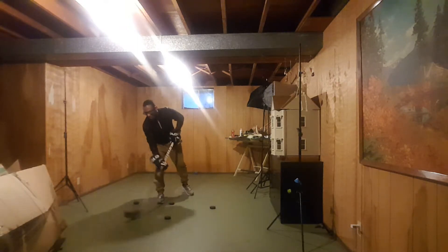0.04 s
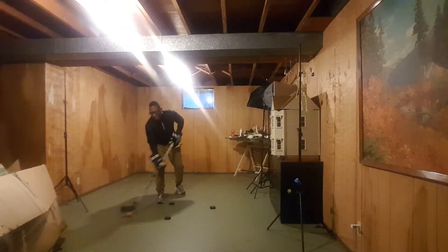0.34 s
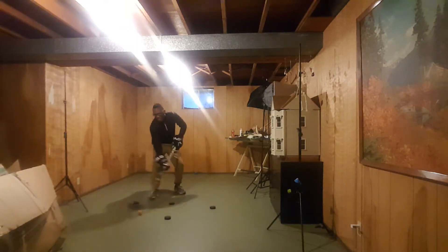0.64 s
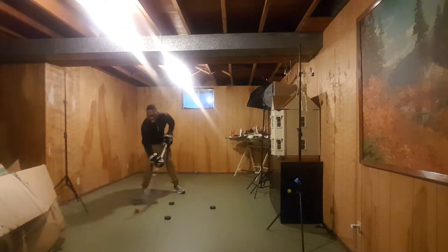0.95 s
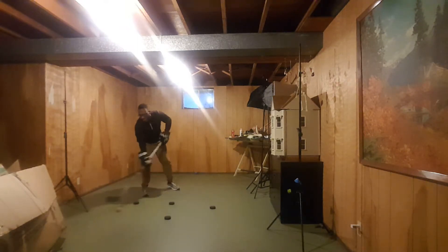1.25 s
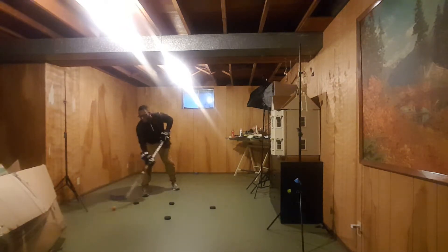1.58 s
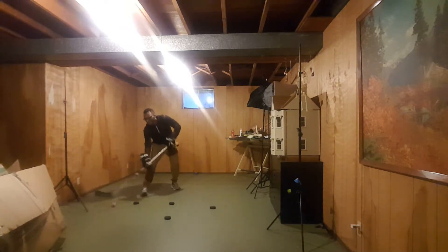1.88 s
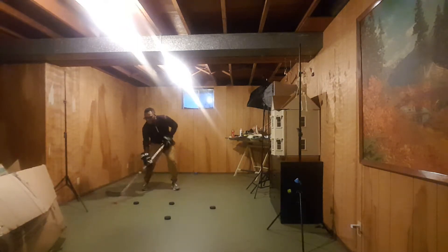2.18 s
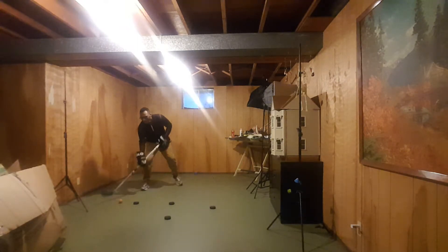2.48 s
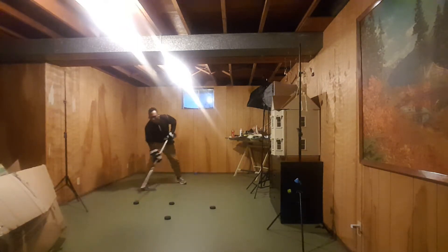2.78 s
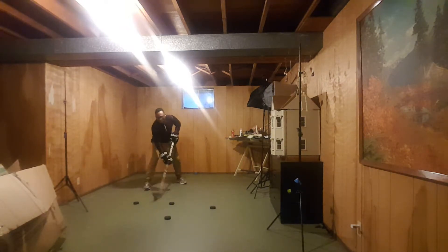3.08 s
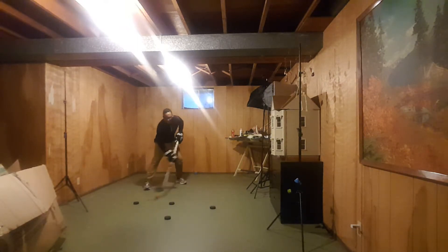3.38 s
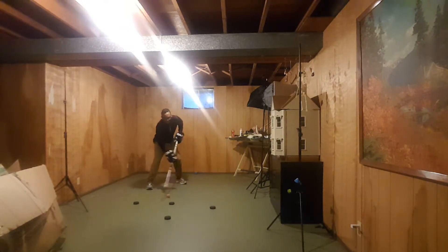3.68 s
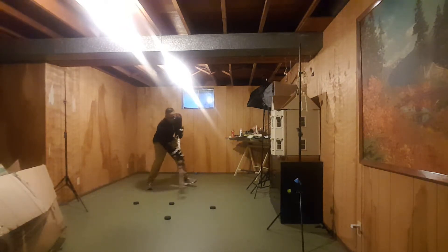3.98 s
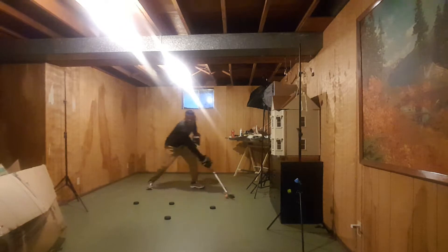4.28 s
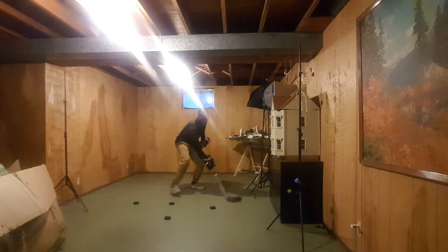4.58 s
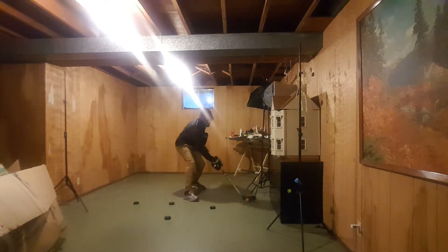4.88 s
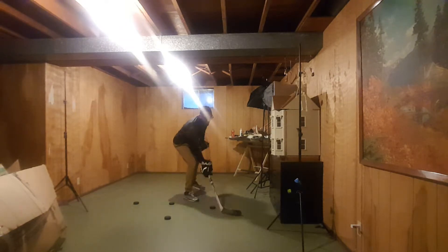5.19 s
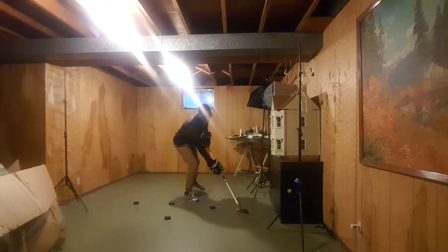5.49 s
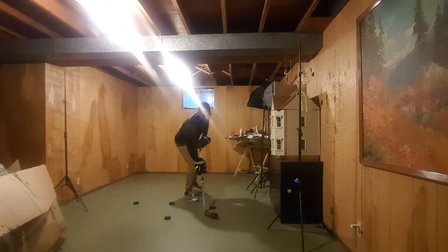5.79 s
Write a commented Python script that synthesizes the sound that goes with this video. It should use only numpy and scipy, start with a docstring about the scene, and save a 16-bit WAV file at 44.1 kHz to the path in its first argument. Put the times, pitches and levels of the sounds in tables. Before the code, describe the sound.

Hollow puck clicks alternate with sharp clacks and duller knocks of a hockey blade on concrete, with a short room echo.

```python
"""A panelled basement, where a player is stickhandling at about three strokes a second. The hockey blade
clicks against a plastic puck, slaps the concrete floor and slides on grit, over the hush of the house.
Each impact excites the resonances of stick and panelling. The microphones stand across the room, so they
hear mostly the reverberant field of the walls, and their gain control ducks under every hard blow."""
import sys
import numpy as np
from scipy import signal
from scipy.fft import rfft, irfft, next_fast_len
from scipy.io import wavfile
from scipy.ndimage import uniform_filter1d, map_coordinates

SR = 44100
rng = np.random.default_rng(int(sys.argv[2]) if len(sys.argv) > 2 else 0)


def int16_out(signal):
    """Quantize to a 16-bit WAV file."""
    q = np.round(np.clip(np.atleast_2d(signal).T, -1, 1) * 32767)
    wavfile.write(sys.argv[1], SR, q.astype(np.int16))


N = 257984
LEAD_S = 1  # lets an earlier blow ring into the opening


def amp(db):
    """Decibels as an amplitude ratio."""
    return 10 ** (np.asarray(db) / 20)


def along(points, hz):
    """Interpolation of (Hz, value) points on a logarithmic frequency axis."""
    point_hz, values = np.transpose(points)
    return np.interp(np.log(hz + 1), np.log(point_hz + 1), values)


def below(hz, edge_hz):
    """A fourth-order shelf: one well under the edge, zero well over it."""
    return 1 / (1 + (hz / edge_hz) ** 4)


def resonance(hz, centre_hz, width_hz):
    """A Lorentzian resonance peak of height one."""
    return 1 / (1 + (2 * (hz - centre_hz) / width_hz) ** 2)


def filtered(x, response):
    """Linear filtering: the spectrum of x times a frequency response."""
    count = x.shape[-1]
    size = next_fast_len(count + SR // 10)
    return irfft(rfft(x, size) * response(np.fft.rfftfreq(size, 1 / SR)), size)[..., :count]


def ringing(colour_db, size=8192):
    """Minimum phase: folding the cepstrum gives a causal impulse response with this spectrum."""
    hz = np.fft.rfftfreq(size, 1 / SR)
    cepstrum = irfft(np.log(amp(colour_db(hz))))
    cepstrum[1:size // 2] *= 2
    cepstrum[size // 2 + 1:] = 0
    return irfft(np.exp(rfft(cepstrum)))


# Coherence of the sound field. Each row: frequency in Hz, left-right correlation from -1 to 1.
COHERENCE = [(100, 0.98), (290, 0.92), (640, 0.67), (1000, 0.13), (1450, -0.3), (2400, 0.074),
             (15000, -0.029)]

def diffuse_noise(count):
    """A diffuse field is alike at two spaced microphones in the bass and unrelated in the treble."""
    def mid_side_gains(hz):
        angle = np.arccos(np.clip(along(COHERENCE, hz), -1, 1)) / 2
        return np.array([np.cos(angle), np.sin(angle)])
    mid, side = filtered(rng.standard_normal((2, count)), mid_side_gains)
    return np.array([mid + side, mid - side])


# Spectrum of the quiet room. Each row: frequency in Hz, relative level in dB.
HUSH_SPECTRUM = [(20, -8), (45, -1), (70, 0.5), (98, 8.5), (130, -1), (250, 1.5), (600, -4.5), (2000, -44),
                 (6000, -22), (15000, -36)]

def room_hush(level_db=-56):
    """Stationary background noise: the low rumble of the house arrives from all sides."""
    rumble = filtered(diffuse_noise(N), lambda hz: amp(along(HUSH_SPECTRUM, hz)))
    return amp(level_db) * rumble / rumble.std()


# Reverberation of the basement. Each row: frequency in Hz, time to decay by 60 dB in seconds.
REVERB_TIMES = [(100, 0.28), (260, 0.43), (700, 0.51), (1840, 0.53), (4850, 0.44), (9000, 0.33),
                (14000, 0.25)]
# Clusters of early reflections. Each row: delay in seconds, level relative to the tail in dB.
REFLECTIONS = [(.0035, 6.5), (.006, 3.5), (0.0234, -2.5)]

def basement_path(roll_s, direct_db=15, blunt_s=0.0016, build_s=0.015, scatter_s=0.0013, cluster_s=0.00035):
    """A room impulse response: direct sound, early reflections and an exponentially decaying tail."""
    hz, t, bands = signal.stft(diffuse_noise(SR), SR, nperseg=256)
    decay = amp(-60 * t / along(REVERB_TIMES, hz)[:, None])
    path = signal.istft(bands * decay, SR, nperseg=256)[1]
    age = np.arange(1, path.shape[1] + 1) / SR
    path *= 1 - np.exp(-age / build_s) / 2  # floor and back wall answer at once, then the room fills
    for delay_s, db in REFLECTIONS:
        arrival_s = delay_s + scatter_s * rng.random()  # shifts with the player's place
        path *= amp(db * np.exp(-((age - arrival_s) / cluster_s) ** 2))
    # a blade that rolls onto its target blunts the attack and weakens the direct sound
    path *= 1 - np.exp(-age / roll_s)
    path[:, 0] += amp(direct_db) * np.exp(-roll_s / blunt_s)
    return path


# Peaks and hollows of stick and panelling. Each row: frequency in Hz, width in Hz, height in dB.
BODY_RESONANCES = [(209, 32, 4), (242, 34, -1), (327, 16, 5), (524.5, 16, 2), (740, 84, 0), (853, 30, 7),
                   (1131, 11.5, 8), (1357, 220, 4), (1984, 13, 9.5), (2257, 37, 6), (2893, 150, -3.5),
                   (2995, 37, 6)]

def stick_colour(hz, ripple_db=2.0, spacing_hz=90):
    """Modal response in dB: fixed resonances, and lesser modes excited anew by each blow."""
    mode_index = 2 * np.sqrt(1000 * hz) / spacing_hz  # spacing_hz apart at 1 kHz, wider above
    lesser = ripple_db * map_coordinates(rng.standard_normal(size=1024), [mode_index], mode="wrap")
    return lesser + sum(db * resonance(hz, centre, width) for centre, width, db in BODY_RESONANCES)


def add_blow(out, start_s, db, colour_db, roll_s):
    """Convolution carries the ring of one blow across the room; out begins LEAD_S early."""
    blow = ringing(lambda hz: colour_db(hz) + stick_colour(hz))
    heard = signal.fftconvolve(blow[None], basement_path(roll_s), axes=1)
    start = round((start_s + LEAD_S) * SR)
    out[:, start:start + heard.shape[1]] += amp(db) * heard[:, :out.shape[1] - start]


# Slides between strokes. Each row: middle in seconds, half length in seconds, level in dB.
BLADE_SLIDES = [(.79, .05, -53), (1.68, .05, -73), (3.025, 0.036, -76), (3.558, 0.07, -55)]

def blade_slides(low_hz=3000, high_hz=9000):
    """Friction noise: grit under the sliding blade makes a faint hiss that swells and fades."""
    t = np.arange(N) / SR
    hiss = filtered(diffuse_noise(N), lambda hz: (1 - below(hz, low_hz)) * below(hz, high_hz))
    pressure = sum(amp(db) * np.exp(-((t - mid_s) / half_s) ** 2) for mid_s, half_s, db in BLADE_SLIDES)
    return pressure * hiss / hiss.std()


# Spectrum of the blade on concrete. Each row: frequency in Hz, level in dB.
FLOOR_SPECTRUM = [(30, -32), (90, -24.5), (160, -15), (330, -12.5), (520, -4), (850, -5.5), (1350, -3.5),
                  (2000, -8.5), (3000, -8), (4200, -16.5), (8500, -22.5), (11000, -30.5), (12800, -31),
                  (16000, -46)]

def floor_colour(thump_db, clack_db, crack_db, knock_hz, knock_db=4.5):
    """An impact excites a broad band: its spectrum in dB has a low thump, a knock, a clack and a crack."""
    def colour(hz):
        thump = thump_db * below(hz, 380)
        knock = knock_db * resonance(hz, knock_hz, width_hz=0.59 * knock_hz)
        clack = clack_db * (1 - below(hz, 1930))
        crack = crack_db * (1 - below(hz, 3550))
        return along(FLOOR_SPECTRUM, hz) + thump + knock + clack + crack
    return colour


# The face of the blade comes down flat, mostly in the wake of a stroke.
# Each row: start in seconds, level in dB, brightness in dB, knock frequency in Hz.
FLAT_LANDINGS = [(.06, -2, -5, 570), (.285, -4, -29, 600), (.875, -4, -8, 870), (2.109, -2.5, -3, 555),
                 (2.687, -4.5, 3, 1600), (3.277, -4, -6.5, 850), (3.683, 0, -1.5, 840),
                 (3.916, -3, -27, 560), (4.325, 3, -25, 510), (4.654, -6, -43, 600),
                 (4.8626, 0, -1.5, 1120), (5.269, -3, -12.5, 1000), (5.514, -4, 0.5, 970)]

def flat_landings(thump_db=-5.5, turn_s=4.1, rolling_s=0.0011, square_s=0.000071):
    """Contact time sets the attack of these duller knocks: once the player turns, they land squarely."""
    out = np.zeros((2, N + LEAD_S * SR))
    for start_s, db, bright_db, knock_hz in FLAT_LANDINGS:
        clack_db = 8 + 0.47 * bright_db
        crack_db = bright_db - clack_db  # the two shelves sum to the brightness in the treble
        colour = floor_colour(thump_db, clack_db, crack_db, knock_hz)
        add_blow(out, start_s, db, colour, rolling_s if start_s < turn_s else square_s)
    return out[:, -N:]


# The edge of the blade strikes the floor.
# Each row: start in seconds, level in dB, clack in dB, crack in dB, knock frequency in Hz.
EDGE_SLAPS = [(-.22, -7, 13, -5, 900), (0.0318, 3.5, -3, 9, 1490), (0.57, 3, 1, 4, 820),
              (1.1155, 5, 4.5, -0.5, 800), (1.7484, 0, 1.5, 3, 900), (2.322, -7, 5.5, -7.5, 860),
              (3.062, -3.5, -1.5, -1, 720), (3.597, -2, 13, -6.5, 1370), (4.2658, 5.5, 1, 9, 1390),
              (4.852, -7.5, -13, 17, 800), (5.4999, -6, -11.5, 17, 625)]

def floor_slaps(base_roll_s=0.0017, crack_per_halving_db=6):
    """Shorter contact favours treble: the more a slap cracks, the less it thumps and the faster it rises."""
    out = np.zeros((2, N + LEAD_S * SR))
    for start_s, db, clack_db, crack_db, knock_hz in EDGE_SLAPS:
        thump_db = -1 - 0.67 * crack_db
        roll_s = base_roll_s * .5 ** (crack_db / crack_per_halving_db)
        add_blow(out, start_s, db, floor_colour(thump_db, clack_db, crack_db, knock_hz), roll_s)
    return out[:, -N:]


# Spectrum of the blade on the puck. Each row: frequency in Hz, level in dB.
PUCK_SPECTRUM = [(30, -26), (90, -22.5), (245, -19.5), (330, -12.5), (520, -9), (850, -5.5), (1350, -4),
                 (3000, -5), (4200, -5.5), (7000, -11.5), (9300, -14.5), (11000, -24), (13000, -23),
                 (16000, -41)]
# Modes of the blade. Each row: frequency in Hz, height in dB when met at the heel, and at the toe.
BLADE_MODES = [(1385, 7.5, -1), (1850, -4, 8), (2250, 5, 6), (2950, 6.5, -5), (4200, 0.5, 5.5)]
# The blade meets the puck. Each row: start in seconds, level in dB, crack in dB, roll-on time in seconds,
# place from heel 0 to toe 1, frequency of the favoured ring in Hz, its height in dB.
PUCK_CONTACTS = [(.2554, 1.5, 5.5, .002, 0.88, 2250, 2.5), (.836, 1.5, -2.5, .0025, 0.066, 2220, 2),
                 (1.3838, 1.5, 4.5, 0.002, 0.16, 2880, 8.5), (2.053, 1.5, 3.5, 0.0037, 0.79, 2110, 1.5),
                 (2.593, -1.5, 2.5, 0.0026, 0, 3400, 8.5), (3.304, 3.5, -8.5, 0.0016, 0.068, 1560, 1.5),
                 (3.8243, 5, 0.5, 0.0034, 0.37, 2520, 2.5), (4.599, -1, -0.5, 0.00022, 0.28, 2320, 7.5),
                 (5.1827, -2, 13, 0.00016, 0.88, 3490, 9.5), (5.797, -4.5, 4, 0.0011, 0.89, 2260, 7.5)]

def puck_clicks(relative_width=0.21, knock_db=-1.0):
    """Free vibration: blade and puck ring with a hollow click; the place of contact weights the modes."""
    out = np.zeros((2, N + LEAD_S * SR))
    for start_s, db, crack_db, roll_s, place, ring_hz, ring_db in PUCK_CONTACTS:
        modes = [(f, heel_db + place * (toe_db - heel_db)) for f, heel_db, toe_db in BLADE_MODES]
        modes.append((ring_hz, ring_db))

        def colour(hz):
            rings = sum(height * resonance(hz, f, relative_width * f) for f, height in modes)
            hardness = knock_db * below(hz, 1180) + crack_db * (1 - below(hz, 6130))
            return along(PUCK_SPECTRUM, hz) + rings + hardness
        add_blow(out, start_s, db, colour, roll_s)
    return out[:, -N:]


def scene():
    """Superposition: stick, puck and floor add to the hush of the house."""
    return floor_slaps() + flat_landings() + puck_clicks() + blade_slides() + room_hush()


def gain_control(x, ceiling_db=-11.0, release_db_per_s=55, window_s=0.0024, attack_s=0.00042):
    """Compression: the gain drops within milliseconds when the level passes the ceiling, then recovers."""
    power = np.abs(uniform_filter1d(np.mean(x ** 2, axis=0), round(window_s * SR)))
    excess_db = np.maximum(10 * np.log10(power + 1e-12) - ceiling_db, 0)
    recovery_db = release_db_per_s * np.arange(N) / SR
    duck_db = np.maximum.accumulate(excess_db + recovery_db) - recovery_db
    pole = np.exp(-1 / (attack_s * SR))
    return x * amp(-signal.lfilter([1 - pole], [1, -pole], duck_db))


def record(dry, peak=0.9, top_hz=15780, edge_hz=400):
    """Limited dynamic range and bandwidth: gain control, peak clipping, then a steep low-pass."""
    limited = np.clip(gain_control(dry), -peak, peak)
    return filtered(limited, lambda hz: np.clip((top_hz - hz) / edge_hz + .5, 0, 1))


dry = scene()
out = record(dry)
int16_out(out)
```